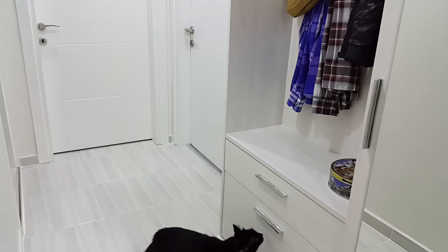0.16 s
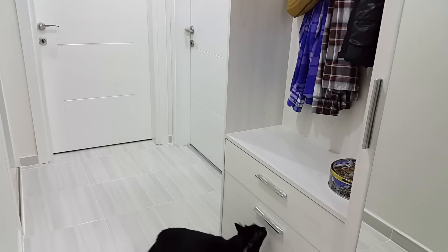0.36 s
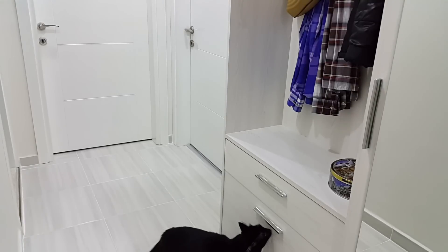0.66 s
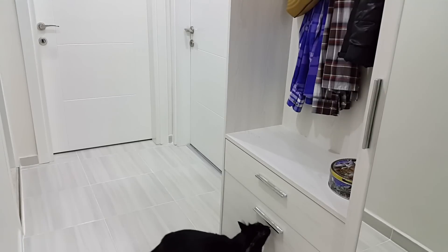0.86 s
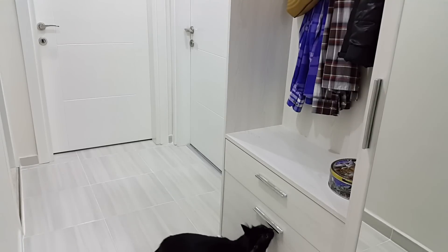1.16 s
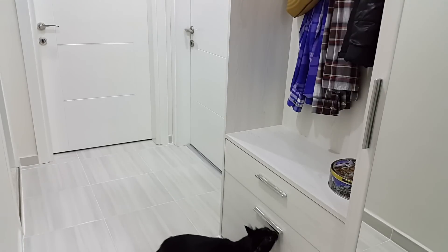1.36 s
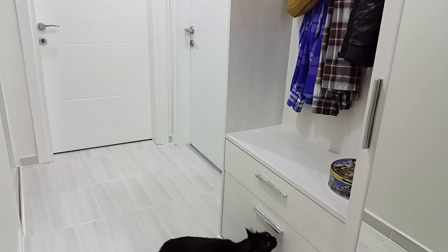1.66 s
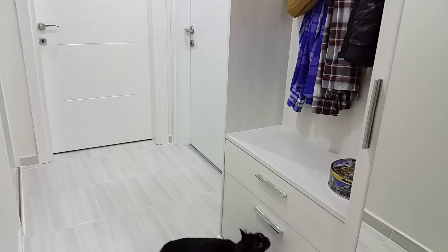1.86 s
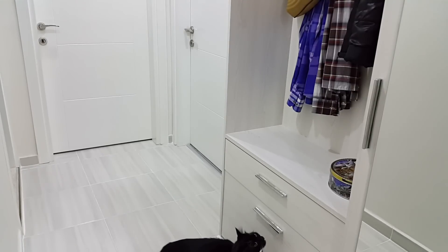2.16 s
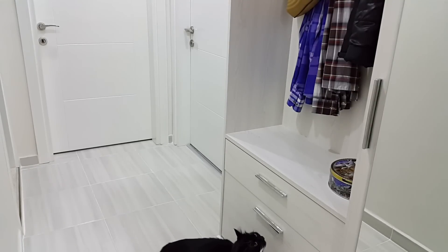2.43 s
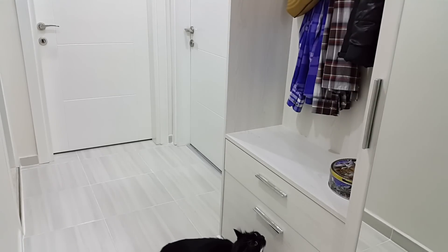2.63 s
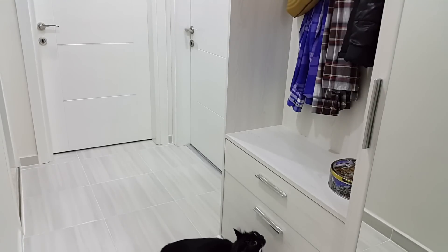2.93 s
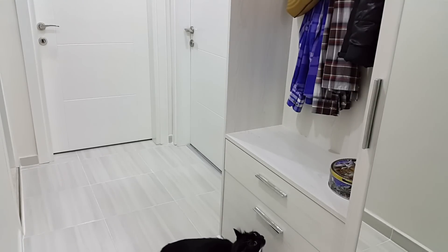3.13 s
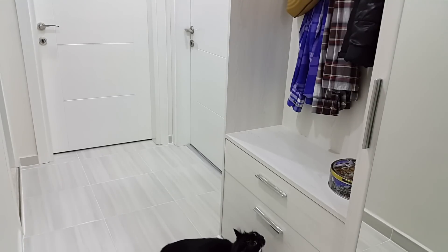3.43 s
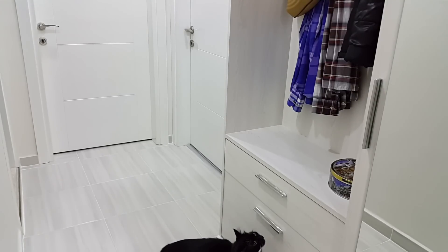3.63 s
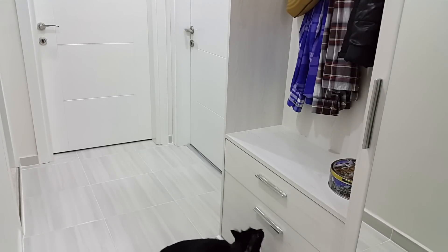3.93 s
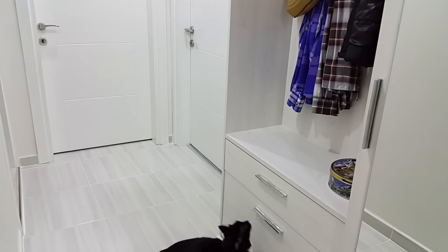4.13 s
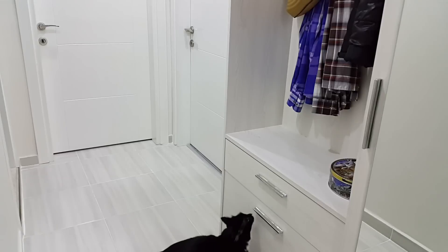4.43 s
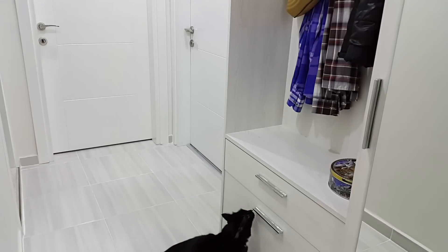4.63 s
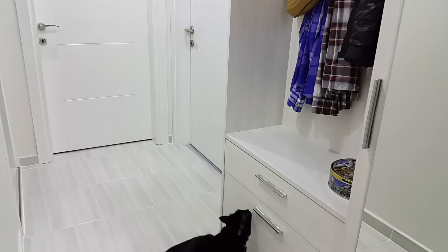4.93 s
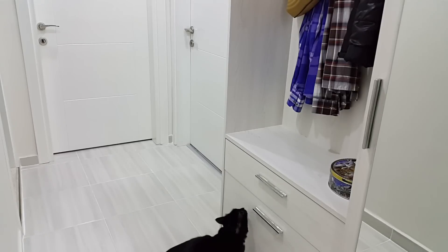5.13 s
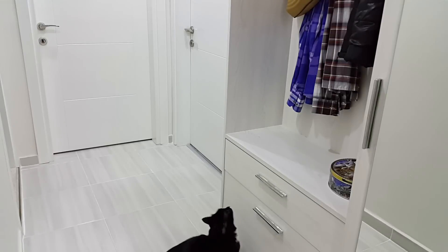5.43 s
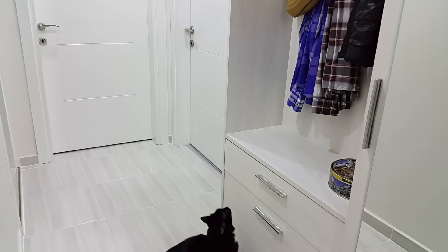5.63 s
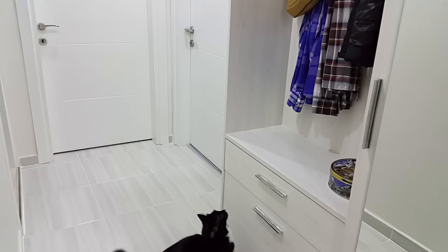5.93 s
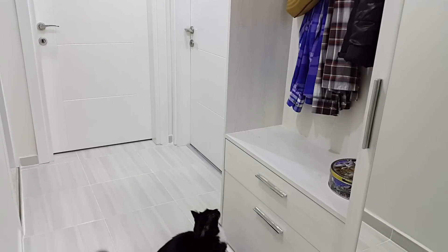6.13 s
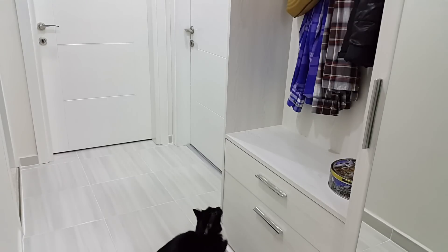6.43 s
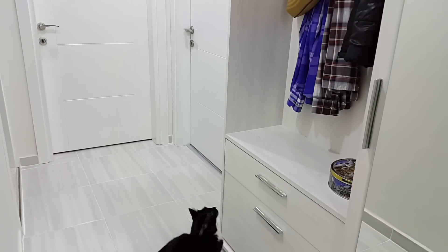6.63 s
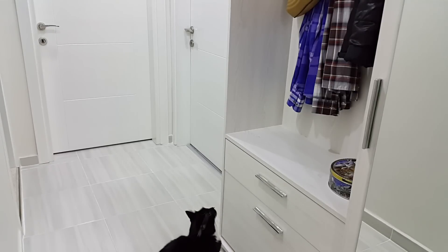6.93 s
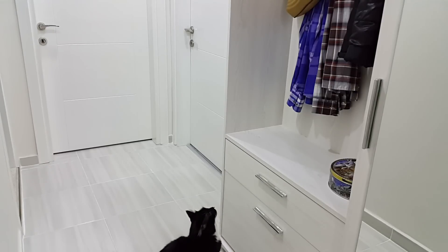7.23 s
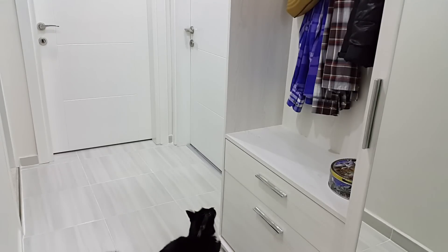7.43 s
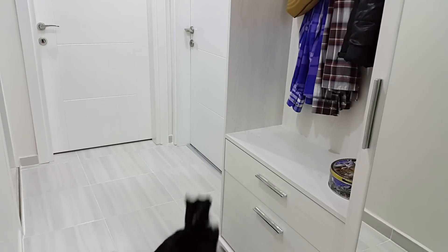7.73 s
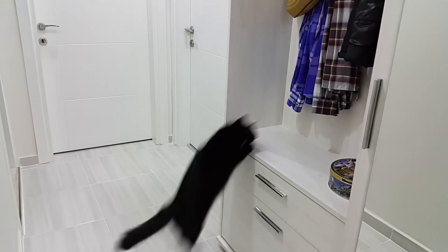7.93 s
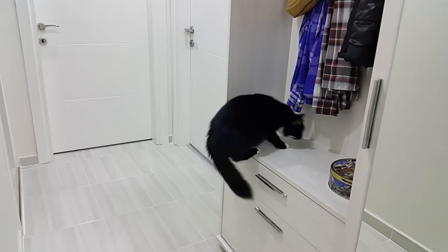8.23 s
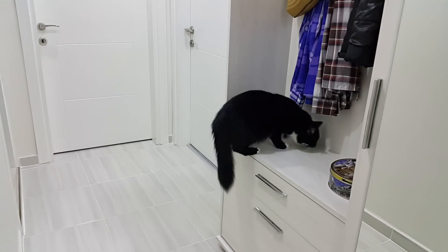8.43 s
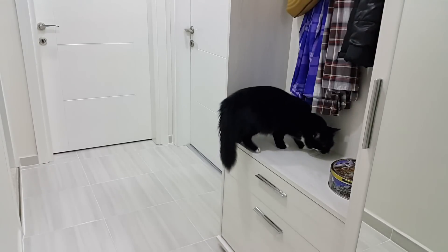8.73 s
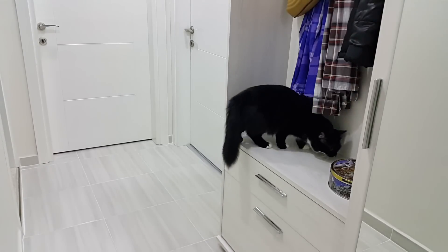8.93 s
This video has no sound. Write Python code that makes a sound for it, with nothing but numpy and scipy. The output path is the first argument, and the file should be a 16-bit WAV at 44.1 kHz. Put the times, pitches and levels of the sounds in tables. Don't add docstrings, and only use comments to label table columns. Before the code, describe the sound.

Inside a tiled hallway, one cat complains in mid-pitched, nasal, drawn-out yowls separated by pauses of about half a second to over a second. The voice starts fluttery, tightens, opens from closed-mouth moan to bright wail, then falls and roughens. The third is loudest. Then a tiny rolling trill, muffled low paw thuds on hollow furniture, and a short, duller meow. Light room echo, low rumble, soft microphone hiss and tiny ticks.

```python
import sys
import numpy as np
from scipy import signal
from scipy.fft import rfft, irfft
from scipy.io import wavfile
from scipy.ndimage import uniform_filter1d

SR = 44100
rng = np.random.default_rng(int(sys.argv[2]) if len(sys.argv) > 2 else 0)


def dump(signal):
    limited = np.clip(np.atleast_2d(signal).T, -1, 1)
    pcm = np.round(limited * 32767).astype(np.int16)
    wavfile.write(sys.argv[1], SR, pcm)


def ratio(d):
    e = np.asarray(d, float) / 20
    return 10 ** e


N = 400428

# time_s, pitch_hz, level_db, mouth_opening_0_1, fold_pressing_db
FIRST_YOWL = [(0.11, 520, -71, 0.1, 0), (0.155, 498, -47, 0, 0), (0.195, 482, -35.5, 0.13, 2.5),
              (0.39, 469.4, -38, 0.25, -0.5), (0.46, 477.4, -32, 0.2, -3.5),
              (0.554, 438.3, -41.5, 0.32, 1.5), (0.572, 440, -66.5, 0.4, 5)]
SECOND_YOWL = [(1.68, 368.3, -47.5, 0.28, -8), (1.74, 381.8, -46.5, 0.19, -7), (1.792, 440, -41.5, .1, 7),
               (1.878, 453.7, -37.5, 0.18, -6.5), (2.31, 448, -36, 0.067, -6.5),
               (2.411, 430.1, -31, 0.65, -3), (2.618, 402.8, -26, 0.59, 8.5), (2.8, 388.3, -33, 0.45, 5.5),
               (2.89, 389.6, -42.5, 0.66, 7.5)]
THIRD_YOWL = [(4.2, 458, -61, 0.34, 3), (4.251, 466, -39, 0.32, -1), (4.331, 464.7, -38.5, 0.16, -1.5),
              (4.5, 476, -39, 0.15, 1), (4.68, 509, -34.5, 0.15, 4.5), (4.818, 500.5, -32, 0.35, 0),
              (4.932, 493.6, -31, 0, 3), (5.0, 470, -31.5, .4, 7), (5.078, 460, -24, 0.58, 0)]
CRY = [(5.1, 441, -24.5, 0.86, -9), (5.141, 437, -24.5, 0.96, 5), (5.19, 430.9, -23, 0.96, 3.5),
       (5.28, 427.2, -22, 0.88, -4.5), (5.42, 419.7, -28, 0.71, -7.5), (5.48, 445, -32.5, 1, 1)]
FOURTH_YOWL = [(5.978, 536, -69, 0.036, -8), (6.07, 537, -33.5, 0.057, 6), (6.3, 504, -40, 0.01, 7.5),
               (6.799, 496.8, -30, 0, -5), (6.949, 466, -35, 0.27, 5.5), (7.049, 433.8, -33.5, 0.39, 3.5),
               (7.238, 409.5, -48.5, 0.66, 9.5), (7.32, 426.2, -35.5, 0, -8), (7.5, 415.4, -36.5, 0.23, -3)]
TRILL = [(7.84, 538, -53.5, 0.0047, 3.46), (7.89, 542.2, -55.5, 0.03, 5), (7.92, 437, -53.5, 0, 11),
         (7.955, 540.4, -46, 0.0032, 11.1), (8.024, 527.2, -51.5, 0.0082, 8), (8.078, 550, -78.5, 0, 8)]
LAST_CALL = [(8.698, 391, -53.5, 0.51, -17.5), (8.754, 467.5, -39, 0.27, 17),
             (8.801, 484.4, -31.5, 0.97, 7), (8.869, 464, -37, 0.27, 8.5), (8.949, 459, -36, 0.22, -5.5),
             (8.999, 432, -62.5, 0.75, 17.5), (9.08, 466, -43.5, 0, 5)]
CALLS = [FIRST_YOWL, SECOND_YOWL, THIRD_YOWL, CRY, FOURTH_YOWL, TRILL, LAST_CALL]
# start_depth_0_1, settled_depth_0_1, settling_s
SETTLING = [
    (.9, .55, .1),
    (.8, .13, .75),
    (.7, .12, .85),
    (.08, .04, .2),
    (.6, .05, .95),
    (.55, .75, .15),
    (.5, .35, .1),
]
SHUT_DB = [1, -12.5, -22.5, -34]
OPEN_DB = [-22, 0.36, -19, -19]
PRESS_SHUT = [0.29, 0.13, 1, .9]
PRESS_OPEN = [-0.5, 0, 0.78, 2]
# pitch_multiple, level_db
HALF_TONES = [(1.5, -17), (2.5, -2.5), (3.5, -12.5), (4.5, -0.5)]
# centre_s, length_s, level_db
SPLITS = [
    (2.687, 0.36, -13.5),
    (5.12, .3, -14.5),
    (6.58, 0.31, -22.5),
    (7.038, 0.16, -10),
    (8.999, .3, -16),
]
# freq_hz, level_db
MOUTH = [(1900, 8), (2200, 3), (2500, -2), (3500, 0), (5000, -5), (7000, -10), (8200, -3), (9500, -16)]
# time_s, lower_hz, upper_hz
TRACT = [(0.3, 4007, 6050), (1.7, 3770, 5870), (2.33, 3837, 6000), (2.41, 4336, 5700), (2.58, 3975, 5520),
         (2.78, 4220, 5100), (2.93, 4386, 5570), (4.2, 4060, 5850), (5.0, 3838, 5700), (5.1, 4375, 6050),
         (5.27, 4465, 5840), (5.4, 4620, 5550), (6.0, 4250, 5780), (6.8, 4114, 6100), (6.97, 4650, 5517),
         (7.2, 4580, 4960), (7.5, 4246, 5400), (8.8, 4450, 5700)]
# start_s, end_s, lower_lift_db, upper_lift_db, middle_lift_db
GAPES = [
    (1.85, 2.379, 6.5, 3, -2.5),
    (2.422, 2.951, 7.5, 17, 6.5),
    (5.0, 5.6, 4, 23, 1),
    (6.89, 7.549, 14, 27, 7.5),
    (8.69, 9.097, -10, -10, 1),
]
# start_s, peak_db, length_s, centre_hz, mouth_hiss_db
RASPS = [(0.054, -53.5, 0.1, 477.5, -11.5), (0.495, -51, 0.13, 450, -9), (1.664, -49.5, 0.061, 490, -8.5),
         (2.873, -39, 0.07, 536, -19), (4.16, -53.5, 0.114, 403, -7.5), (5.446, -49, 0.055, 480.5, -4.5),
         (5.977, -54.5, 0.057, 410, -11), (6.831, -55, 0.022, 1488, -6), (7.467, -52, 0.022, 452, 2.5),
         (7.928, -54.5, 0.13, 510, -2.5), (8.697, -54, 0.065, 464.4, 7.5)]
# start_s, peak_db, pitch_hz, t60_s
PAWS = [
    (8.031, -50, 149.4, 0.13),
    (8.13, -50.5, 89.6, 0.16),
    (8.24, -56.5, 74, 0.59),
    (8.33, -60, 109.7, 0.29),
]
# freq_hz, t60_s
HALL_T60 = [(300, 0.5), (500, 0.44), (1000, 0.5), (4000, 0.34), (10000, 0.27)]
# time_s, peak_db
TICKS = [(0.0408, -57), (2.1126, -55), (4.1859, -55), (6.2694, -57), (8.3619, -56)]
# freq_hz, density_db_per_hz
FLOOR = [(20, -22.5), (45, -7), (130, -3.5), (200, -1), (400, -12.5), (650, -9), (1000, -15), (2000, -18.5),
         (5200, -25), (5800, -21), (8700, -21.5), (9600, -26), (13000, -25), (15800, -21.5)]
# freq_hz, correlation
FLOOR_LIKENESS = [(25, .7), (60, .45), (180, .45), (550, .25), (1650, 0), (15000, 0)]
# freq_hz, difference_db
FLOOR_BALANCE = [(60, 6.0), (110, 8.0), (200, 5.5), (380, 2.5), (700, 1.0), (1290, 1.0), (2380, 1.0),
                 (4400, 1.5), (8120, 9.0), (15000, 2.5)]


def voice():
    flutter_hz, wander_db, lump_db, tremble = 43, 5, 4.5, .005
    hz, level_db, opening, press_db = in_time(np.concatenate(CALLS))
    opening = np.clip(opening, 0, 1)
    flutter, half_db = flutter_depth(), splitting()
    lower_hz, upper_hz = in_time(TRACT)
    lower_db, upper_db, middle_db = jaw()
    middle_db = middle_db + .5 * press_db

    ladder_db = []
    for shut_db, open_db, press_shut, press_open in zip(SHUT_DB, OPEN_DB, PRESS_SHUT, PRESS_OPEN):
        when_shut_db = (shut_db + press_shut * press_db) * (1 - opening)
        when_open_db = (open_db + press_open * press_db) * opening
        ladder_db.append(level_db + when_shut_db + when_open_db + wander_db * flutter * wobble(6, 17))
    effort_db = 10 * np.log10(uniform_filter1d(sum(ratio(db) ** 2 for db in ladder_db), size=5000))
    fourth_db = 10 * np.log10(uniform_filter1d(ratio(ladder_db[3]) ** 2, size=2500))
    cut_db = 25 * np.clip(5 * hz / 2150 - 1, 0, 1) / 0.075
    ladder_db.append(fourth_db - 10 - .4 * press_db - cut_db)

    beat = 2 * np.pi * np.cumsum(flutter_hz * (1 + .08 * wobble(2, 12))) / SR
    shake = np.sin(beat) * ratio(1.5 * wobble(2.35, 15)) + 0.45 * wobble(22.2, 60)
    moving_hz = hz * (1 + .06 * flutter * shake + tremble * wobble(10, 30))
    phase = 2 * np.pi * np.cumsum(moving_hz) / SR

    out = sum(ratio(db) * np.sin(k * phase) for k, db in enumerate(ladder_db, 1))
    for k, db in HALF_TONES:
        between_db = (ladder_db[int(k) - 1] + ladder_db[int(k)]) / 2
        out += ratio(between_db + half_db + 10 + db) * np.sin(k * phase) * (.7 + .6 * wobble(3, 50))
    top = 0
    for k in range(4, 27):
        middle = ratio(middle_db + at_hz(MOUTH, k * hz))
        lower = ratio(lower_db) / (1 + ((k * hz - lower_hz) / 210) ** 2) ** 2
        upper = ratio(upper_db) / (1 + ((k * hz - upper_hz) / 230) ** 2) ** 2
        top += (middle + lower + upper) * np.sin(k * phase + k * k)
    out += top * ratio(effort_db) * (1 + 2.5 * ratio(half_db) * np.cos(phase / 2))

    out *= np.sqrt(2) * (1 + np.clip(0.52 * flutter, 0, 1) * np.sin(beat + 0.21))
    out *= ratio(lump_db * flutter * wobble(11.7, 35))
    out = signal.sosfilt(signal.butter(10, 405, "high", fs=SR, output="sos"), out)
    breath = breath_noise(flutter, lower_hz, upper_hz, lower_db, upper_db, middle_db)
    return (out + breath * ratio(effort_db)) * sounding_gate()


def breath_noise(flutter, lower_hz, upper_hz, lower_db, upper_db, middle_db):
    leak = rms_one(band(rng.standard_normal(N), 780, 2000)) * ratio(-24) * (flutter + 0.05)
    lower = hiss_at(lower_hz, 200) * ratio(lower_db - 1)
    upper = hiss_at(upper_hz, 200) * ratio(upper_db - 4)
    middle = rms_one(band(rng.standard_normal(N), 2400, 8500)) * ratio(middle_db - 1)
    return leak + (lower + upper) * (flutter + .3) + middle


def sounding_gate():
    t = np.arange(N) / SR
    sounding = sum((t >= call[0][0]) & (t < call[-1][0]) for call in CALLS) > 0
    sounding |= (t > THIRD_YOWL[0][0]) & (t < CRY[-1][0])
    return uniform_filter1d(sounding * 1., size=1100)


def flutter_depth():
    let_go_depth, let_go_s = .45, .04
    out = np.zeros(N)
    for call, after, (loose, settled, settle_s) in zip(CALLS, CALLS[1:] + [[[99]]], SETTLING):
        start, end = call[0][0], call[-1][0]
        pause_follows = after[0][0] - end > .1
        let_go = let_go_depth * ramp(end - let_go_s, let_go_s) * pause_follows
        depth = loose + (settled - loose) * ramp(start, settle_s) ** 1.5 + let_go
        out = np.where(ramp(start - .01, .01) > 0, depth, out)
    return out


def splitting():
    unsplit_db = -33
    swells_db = 0
    for s, length, db in SPLITS:
        swells_db = swells_db + (db - unsplit_db) * np.sin(np.pi * ramp(s - length / 2, length))
    return unsplit_db + swells_db


def jaw():
    gape_s, upper_fade_db_per_s = .15, 14
    lift_db = 0
    for start, end, lower_db, upper_db, middle_db in GAPES:
        down = ramp(start, gape_s) * (1 - ramp(end, .05))
        fade_db = upper_fade_db_per_s * ramp(start, 0.78)
        gape_db = np.array([[lower_db], [upper_db], [middle_db]]) - fade_db * [[0], [1], [0]]
        lift_db = lift_db + down * gape_db
    return lift_db + [[-33.5], [-48.5], [-47.5]]


def rasps():
    spread, length_n = 1.39, 9000
    out = np.zeros(N)
    for s, db, length, hz, hiss_db in RASPS:
        slaps_db = 2.5 * np.repeat(rng.standard_normal(60), 150)
        noise = rng.standard_normal(length_n) * ratio(slaps_db)
        shape = np.sin(np.pi * np.clip(np.arange(length_n) / SR / length, 0, 1))
        throat = rms_one(steep_band(noise, hz / spread, hz * spread))
        mouth = rms_one(steep_band(noise, 750, 1950))
        rasp = ratio(db) * (throat + ratio(hiss_db) * mouth) * shape
        at = round(s * SR)
        out[at:at + length_n] += rasp[:N - at]
    return out


def paws():
    out, t = np.zeros(N), np.arange(13000) / SR
    for s, db, hz, t60 in PAWS:
        thump = np.sin(2 * np.pi * hz * t) * (1 - np.exp(-t / 0.00622)) * ratio(-60 * t / t60)
        puff = 0.35 * rms_one(band(rng.standard_normal(len(t)), 119.7, 523)) * ratio(-60 * t / 0.31)
        at = round(s * SR)
        out[at:at + len(t)] += ratio(db) * (thump + puff)
    return out


def hallway(x):
    t = np.arange(SR) / SR
    white = rng.standard_normal((2, SR))
    edges_hz = 60 * 2. ** np.arange(9)
    tail = 0
    for low, high in zip(edges_hz, edges_hz[1:]):
        share = min(.9, 200 / low)
        ears = np.stack([white[0], share * white[0] + np.sqrt(1 - share ** 2) * white[1]])
        tail = tail + band(ears, low, high) * ratio(-60 * t / at_hz(HALL_T60, np.sqrt(low * high)))
    tail *= np.clip((t - .003) / 0.02, 0, 1)
    return signal.fftconvolve(x[None], tail / np.sqrt(np.sum(tail ** 2) / 2), axes=1)[:, :N]


def ticks():
    clicks = np.zeros(N)
    clicks[[round(s * SR) for s, db in TICKS]] = ratio(np.array(TICKS)[:, 1] + 17)
    return steep_band(clicks + 1e-18, 5200, 9500) * ratio(np.array([[2], [-2]]))


def noise_floor():
    level_db = -68.5
    hz = np.maximum(np.fft.rfftfreq(N, 1 / SR), 1)
    mid, side = rfft(rng.standard_normal((2, N)))
    alike = np.clip(at_hz(FLOOR_LIKENESS, hz), -1, 1)
    lean_db = at_hz(FLOOR_BALANCE, hz) / 2
    pair = np.sqrt(1 + alike) * mid + np.sqrt(1 - alike) * side * [[1], [-1]]
    out = irfft(ratio(at_hz(FLOOR, hz)) * pair * ratio(np.array([lean_db, -lean_db])), N)
    return out / np.sqrt(np.mean(out.mean(axis=0) ** 2)) * ratio(level_db)


def at_hz(points, hz):
    return np.interp(np.log(hz), np.log(np.array(points)[:, 0]), np.array(points)[:, 1])


def in_time(rows):
    s, *columns = np.transpose(rows)
    return [np.interp(np.arange(N) / SR, s, c) for c in columns]


def ramp(start_s, length_s):
    return np.clip((np.arange(N) / SR - start_s) / max(length_s, .01), 0, 1)


def band(x, low_hz, high_hz):
    edges_hz = [low_hz, min(high_hz, SR / 2.2)]
    return signal.sosfilt(signal.butter(2, edges_hz, "band", fs=SR, output="sos"), x)


def steep_band(x, low_hz, high_hz):
    return band(band(x, low_hz, high_hz), low_hz, high_hz)


def rms_one(x):
    return x / np.sqrt(np.mean(x ** 2) + 1e-20)


def wobble(low_hz, high_hz):
    return rms_one(band(rng.standard_normal(N), low_hz, high_hz))


def hiss_at(hz, width_hz):
    pair = signal.sosfilt(signal.butter(2, width_hz, fs=SR, output="sos"), rng.standard_normal((2, N)))
    turn = 2 * np.pi * np.cumsum(hz) / SR
    return rms_one(pair[0] * np.sin(turn) + pair[1] * np.cos(turn))


def scene():
    cat = voice() + rasps()
    near = np.stack([np.roll(cat, 3), cat])
    heard = ratio(np.array([[-4], [-5]])) * near
    heard = heard + ratio(np.array([[-0.5], [-2.5]])) * hallway(cat)
    heard = heard + paws() * ratio(np.array([[1.5], [-1.5]]))
    level_db = 10 * np.log10(uniform_filter1d(heard[0] ** 2, size=6000) + 1e-12)
    opened = uniform_filter1d(np.clip((level_db + 63) / 12, 0, 1), size=3000)
    return heard + noise_floor() * ratio(2.94 * opened) + ticks()


def band_limit(x):
    return signal.sosfilt(signal.butter(12, 15900, fs=SR, output="sos"), x)


def record(dry):
    rounded = .3 * np.tanh(dry / .3)
    mix = rounded - .0005
    return band_limit(mix)


dry = scene()
out = record(dry)
dump(out)
```